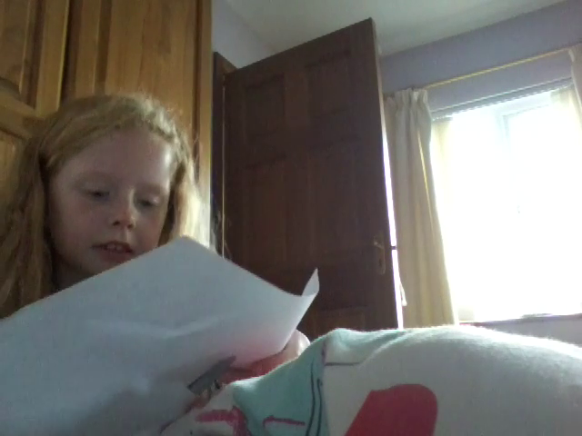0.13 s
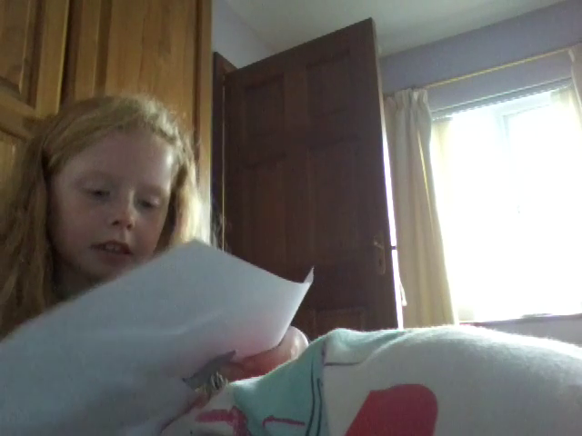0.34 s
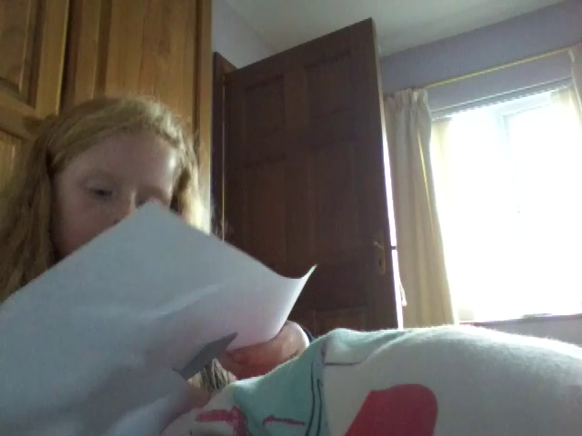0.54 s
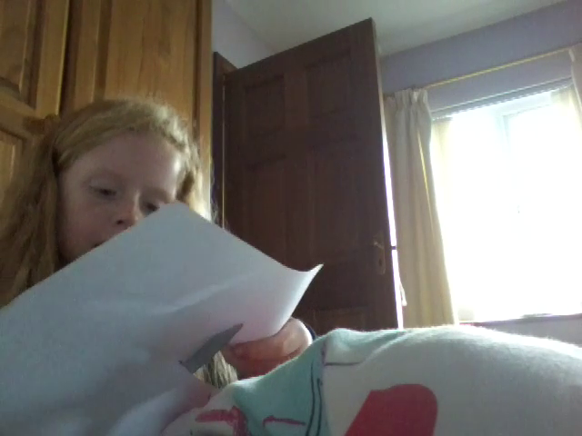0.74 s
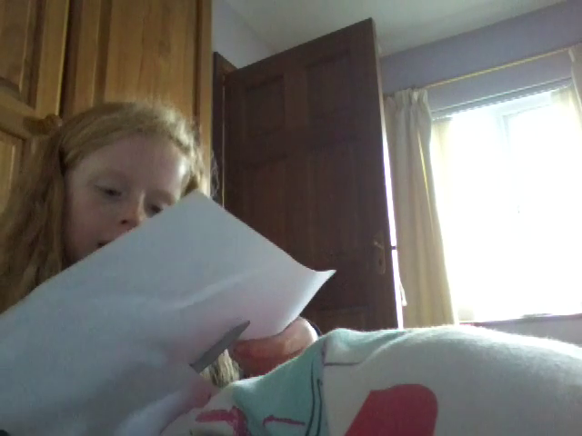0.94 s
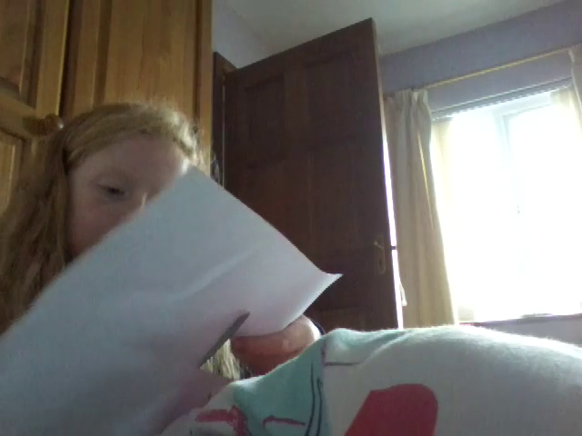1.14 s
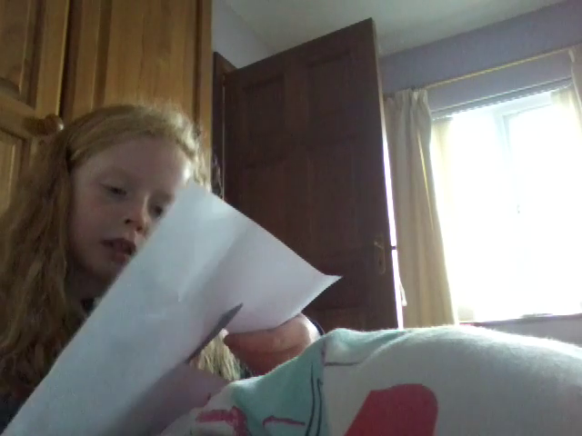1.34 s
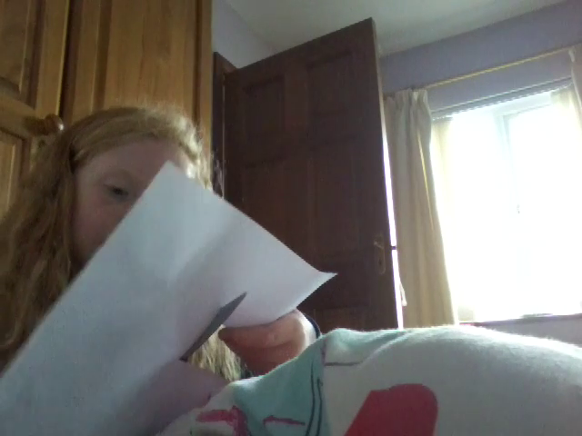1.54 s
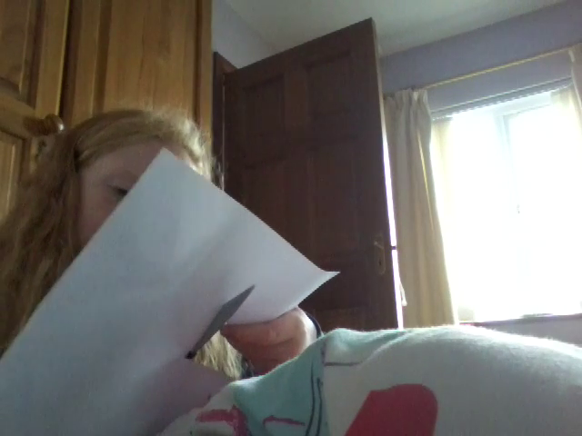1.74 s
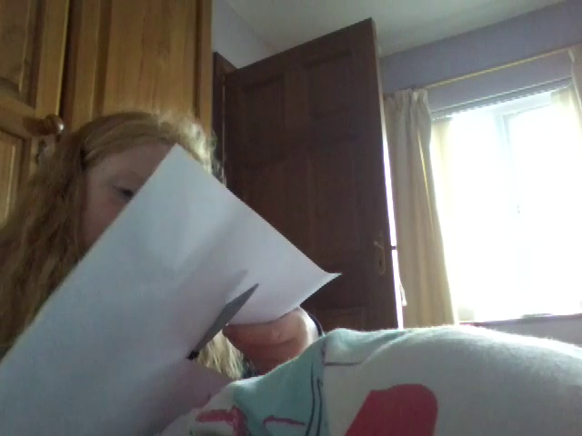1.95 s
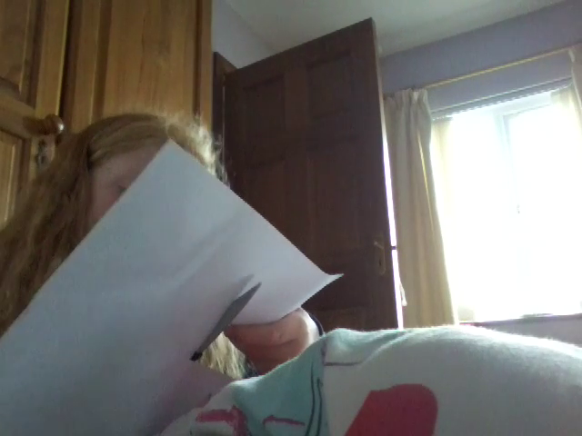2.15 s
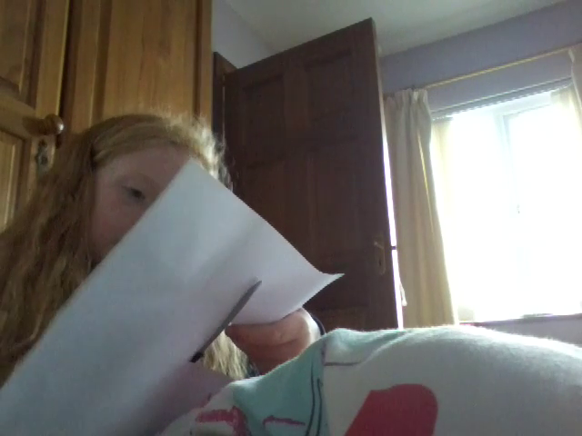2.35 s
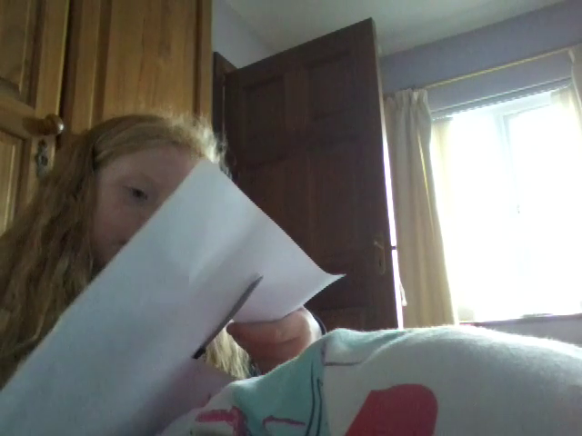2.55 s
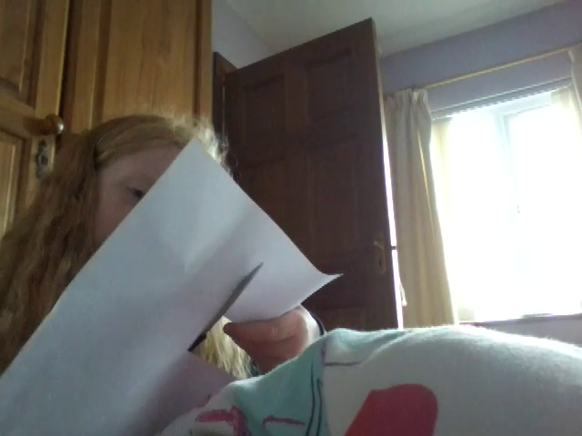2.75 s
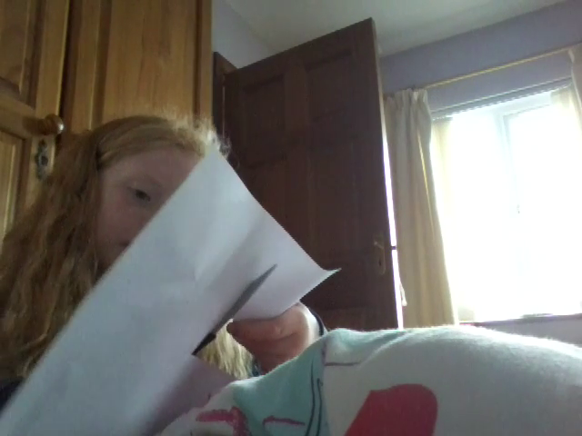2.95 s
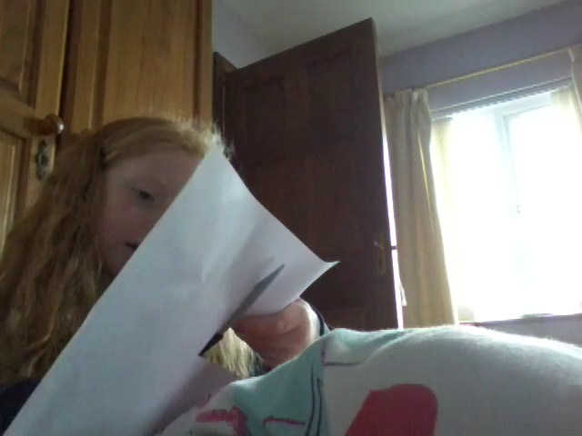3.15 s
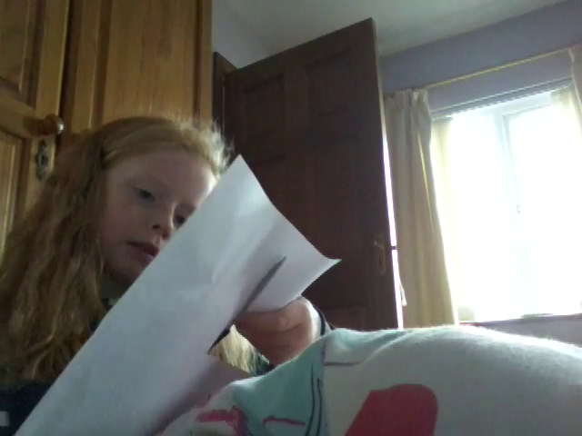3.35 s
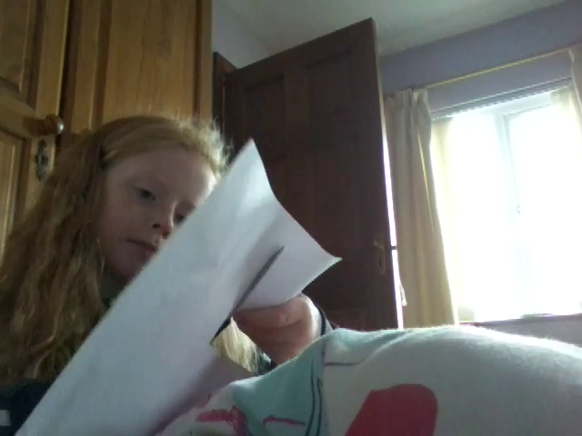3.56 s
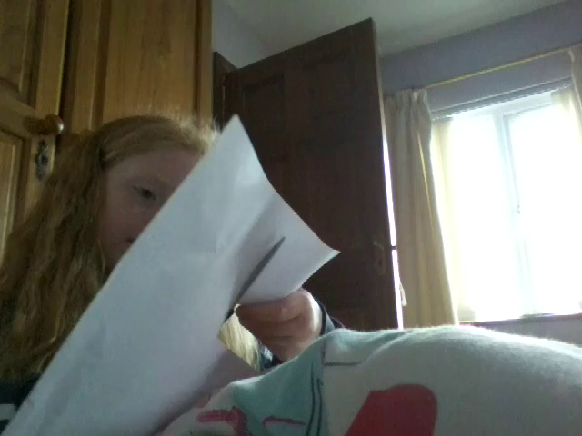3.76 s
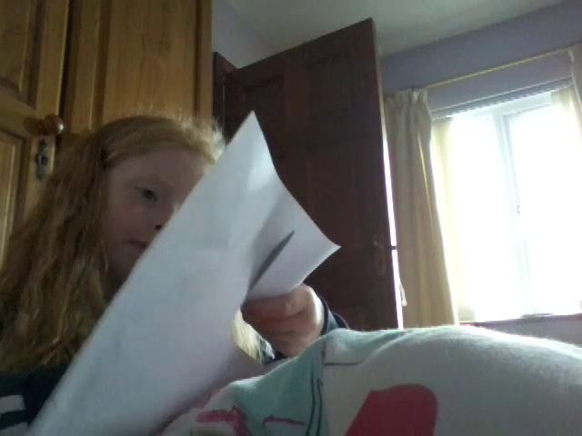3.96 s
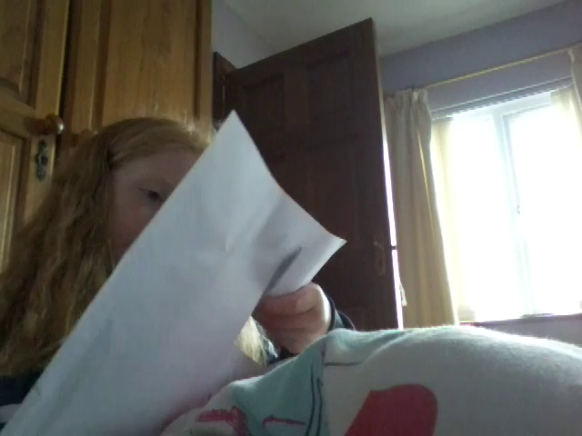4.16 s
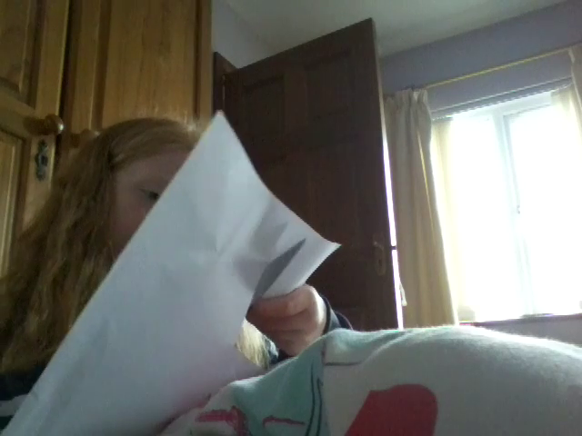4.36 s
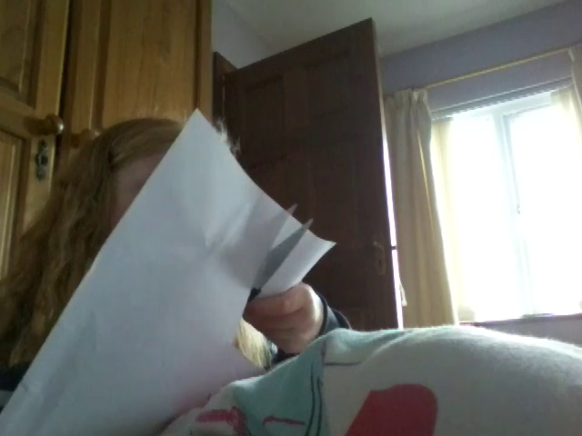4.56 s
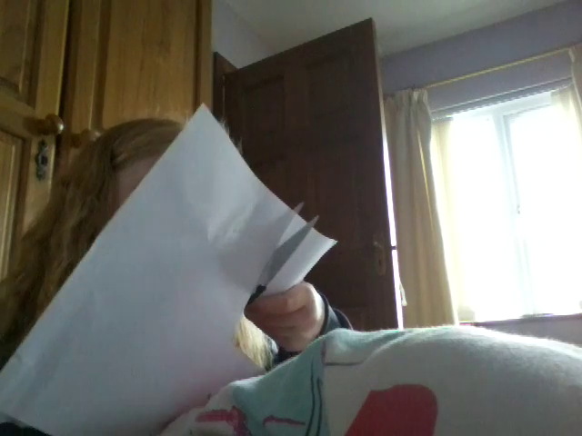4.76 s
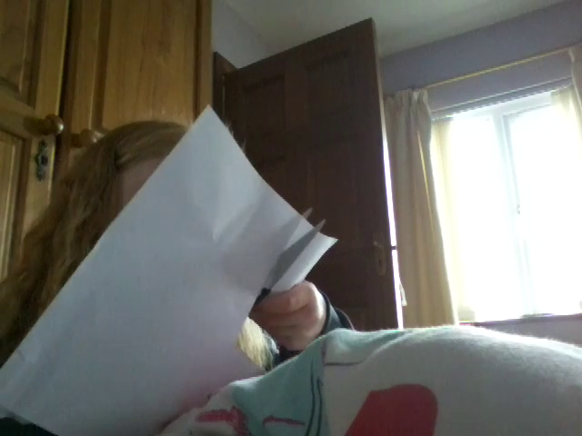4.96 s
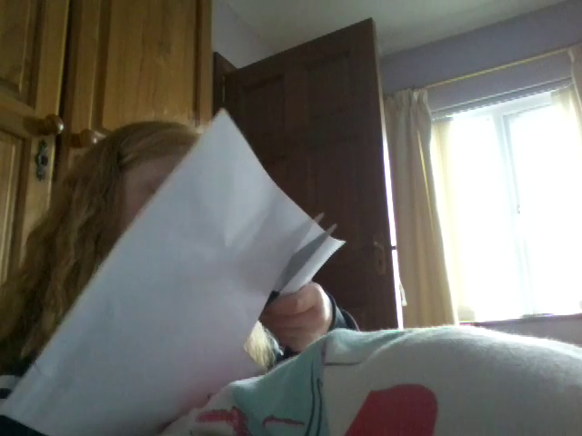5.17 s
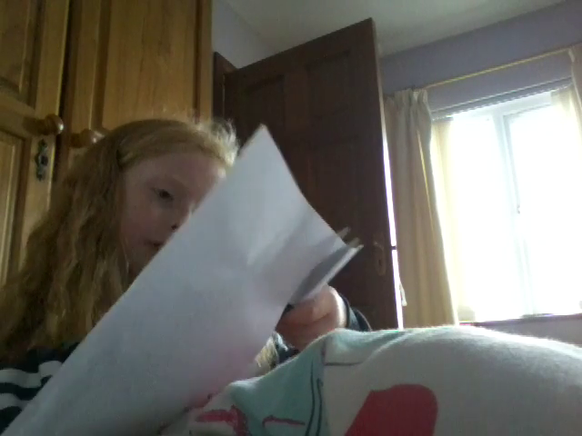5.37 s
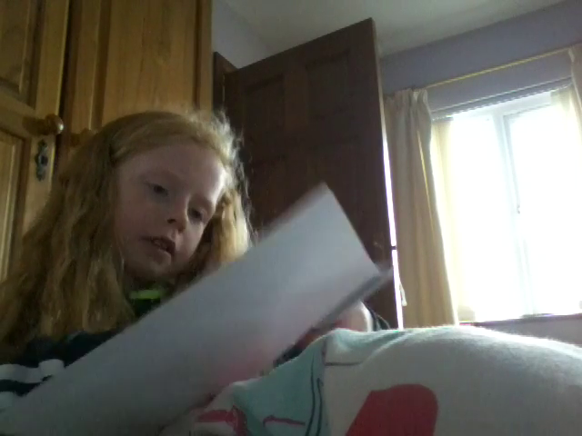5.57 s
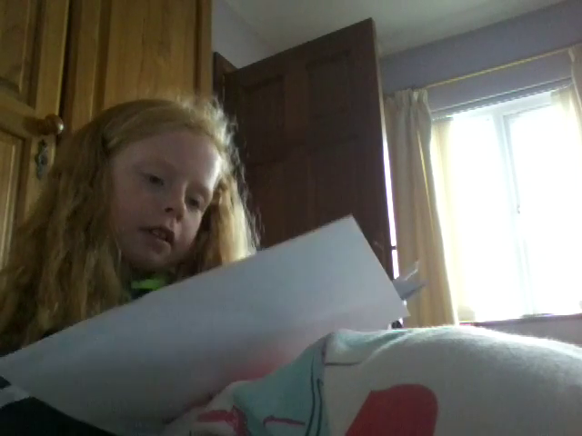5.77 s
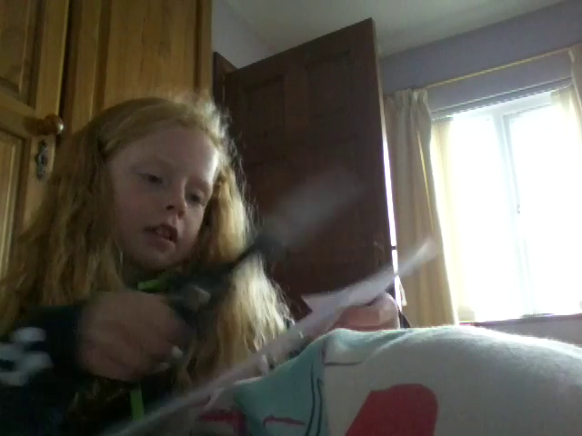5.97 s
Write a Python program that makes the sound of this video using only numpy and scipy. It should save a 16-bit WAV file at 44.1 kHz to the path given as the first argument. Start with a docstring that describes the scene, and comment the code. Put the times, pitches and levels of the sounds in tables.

```python
"""Scissors cut a large sheet of paper in a quiet bedroom, close to a small built-in microphone.
Randomly parting fibres make the tearing and crackle, in strokes with sharp bursts where the blades slip.
The same fibres set the sheet drumming and ringing; the moving sheet adds a low rumble, the room short echoes.
The recorder adds hiss and a pulsing whine near 15 kHz, and a suppressor turns quiet moments down."""
import sys
import numpy as np
from scipy import signal
from scipy.fft import rfft, irfft
from scipy.io import wavfile
from scipy.ndimage import uniform_filter1d, map_coordinates

SR = 44100
rng = np.random.default_rng(int(sys.argv[2]) if len(sys.argv) > 2 else 0)


def put_to_file(sound):
    """Save the sound as 16-bit audio at rate SR, in the file named by the first command-line argument."""
    columns = np.atleast_2d(sound).T  # one column per channel
    safe = np.clip(columns, -1, 1)
    whole_steps = np.round(safe * 32767)
    wavfile.write(sys.argv[1], SR, whole_steps.astype(np.int16))


N = 264952

# Strokes of the blades. Each row: start in seconds, swell in seconds, hold in seconds, tearing level in dB,
# change over the hold in dB, sheet crackle in dB relative to tearing, drumming in dB relative to tearing.
STROKES = [(0.0, 0.00067, 0.11, -43, -3.5, -11.5, -14), (0.098, .02, 0.078, -49.5, -3.5, -14, -19.5),
           (0.214, 0.033, 0.26, -54.5, -14, -16, -12), (0.38, 0.019, .05, -45, -6.5, -14.5, -16),
           (0.434, 0.048, 0.097, -45.5, 0.5, -15, -18.5), (0.587, 0.022, 0.067, -51, -5, -10.5, -23),
           (0.671, 0.054, 0.019, -49.5, 1, -22, -28), (0.824, 0.022, 0.058, -53, -2.5, -15, -12.5),
           (0.925, 0.026, 0.082, -38, -6, -14.5, -18), (1.073, 0.021, 0.038, -43, -2, -9.5, -22),
           (1.315, 0.014, 0.038, -41.5, 2, -14.5, -19.5), (1.356, 0.041, 0.027, -35, -10, -19.5, -25.5),
           (1.463, 0.028, 0.054, -36, 3, -20, -31.5), (1.655, 0.02, 0.048, -37.5, -4.5, -15.5, -29.5),
           (1.765, 0.024, 0.46, -66.5, 6, -17, -17), (1.842, 0.022, 0.0081, -50, -2, -8, -20),
           (2.024, 0.084, .01, -53.5, 1, -20, -20), (2.173, .03, 0.053, -56, 4.5, -21, -23),
           (2.274, 0.057, 0.057, -42, -6.5, -20, -23.5), (2.422, 0.028, 0.0081, -39, -4.5, -19, -32),
           (2.696, 0.026, 0.15, -43.5, -10.5, -17, -26), (2.804, 0.12, 0.041, -41.5, -4.5, -15.5, -25),
           (2.989, 0.041, 0.079, -55.5, -6, -13, -16), (3.142, 0.089, 0.14, -49, 6.5, -20, -22.5),
           (3.399, 0.015, 0.016, -35, -3, -20.5, -27), (3.468, 0.029, 0.23, -52, -1, -20, -22),
           (3.734, 0.056, .12, -46.5, 4, -16.5, -23.5), (3.892, 0.015, 0.15, -48, -7, -24, -21.5),
           (4.026, 0.06, 0.054, -35, -9, -14, -26), (4.11, 0.074, 0.063, -38, -5.5, -15, -27),
           (4.292, 0.11, 0.095, -46, 1.5, -15.5, -23), (4.486, 0.026, 0.094, -48.5, -5.5, -13.5, -18),
           (4.581, 0.025, 0.058, -50.5, 5, -13.5, -20), (4.7, 0.025, 0.22, -58, -5.5, -16, -14),
           (5.063, .06, 0.17, -56, -8, -27, -17), (5.255, 0.02, 0.2, -51.5, -4, -15.5, -20.5),
           (5.468, 0.025, 0.23, -40.5, -6, -17.5, -25), (5.713, 0.02, 0.19, -37, -21.5, -15.5, -23),
           (5.91, .06, 0.046, -55, 4, -8.5, -10.5)]
# Clear slips of the blades and snaps of the sheet. Each row: time in seconds (late in the swell), peak in dB,
# crackle rms in dB relative to the peak, drumming rms in dB relative to the peak, swell time in seconds.
SLIPS = [(0.068, -31.5, -16, -16, 0.0027), (0.1034, -28.5, -35, -34, 0.0035),
         (0.171, -30.5, -23, -27, 0.0034), (0.3915, -24, -28, -25, 0.0013), (0.4004, -37, -25, -23, 0.0018),
         (0.5048, -27, -40, -41, 0.0024), (0.514, -29, -35, -33, 0.0012), (0.7437, -34, -37, -43, 0.004),
         (0.8335, -39, -20, -32, 0.003), (0.932, -29.5, -19, -16.5, 0.003), (1.083, -20, -24, -31, 0.0024),
         (1.1164, -29.5, -13.5, -35, 0.0023), (1.3333, -26, -32, -46, 0.0039),
         (1.3743, -10.5, -29, -44, 0.001), (1.383, -20.5, -35, -42, 0.0016),
         (1.4716, -28.5, -27, -34, 0.0027), (1.481, -28, -39, -44, 0.0023),
         (1.558, -23.5, -22.5, -49, 0.005), (1.6633, -26, -19, -40, 0.0024),
         (1.717, -26.5, -23.5, -36, 0.0054), (1.8038, -37, -23, -31, 0.0026),
         (2.0233, -45, -18, -22, 0.0033), (2.0516, -36.5, -23, -35, 0.0044),
         (2.0847, -36, -19, -22, 0.0032), (2.157, -39, -15.5, -21, 0.0037),
         (2.1852, -30.5, -22.5, -25, 0.0069), (2.2314, -28.5, -27, -27, 0.0051),
         (2.2694, -31, -24, -27, 0.0049), (2.3082, -25.5, -31, -28, 0.0041),
         (2.337, -28.5, -28, -35, 0.003), (2.3583, -26.5, -32, -35, 0.0019),
         (2.373, -19.5, -39, -42, 0.0027), (2.431, -14, -33, -42.5, 0.0028),
         (2.6944, -36.5, -27, -28, 0.0024), (2.7096, -35, -32, -31, 0.0026), (2.9083, -33, -26, -34, 0.003),
         (3.1482, -41.5, -20, -31, 0.0035), (3.1827, -38.5, -21, -31, 0.0026),
         (3.2266, -35.5, -22, -22, 0.0032), (3.2765, -38, -14.5, -22, 0.003),
         (3.327, -26, -25.5, -34, 0.0035), (3.4086, -22, -37, -22, 0.0032), (3.4942, -27, -31, -24, 0.0028),
         (3.5865, -32.5, -35, -31, 0.0022), (3.6156, -18, -28.5, -43, 0.001),
         (3.6258, -23, -40, -50, 0.0012), (3.756, -36, -20, -21, 0.0027), (3.7742, -27, -18.5, -30, 0.0027),
         (3.8056, -29, -21, -33, 0.0046), (3.84, -23.5, -30, -40, 0.0019), (3.8888, -21, -30, -51, 0.0022),
         (3.973, -31, -25, -31, 0.0024), (4.0238, -31, -17.5, -23, 0.003), (4.053, -29, -29, -29, 0.002),
         (4.0715, -15, -16, -28, 0.0021), (4.0934, -29.5, -15, -21, 0.0046),
         (4.1674, -26.5, -21, -23.5, 0.0055), (4.1983, -26, -16.5, -23.5, 0.0073),
         (4.3435, -28, -27, -34, 0.0017), (4.404, -28, -23.5, -39, 0.0034),
         (4.6075, -39, -11.5, -26, 0.0039), (5.0579, -38.5, -19, -27, 0.0024),
         (5.0834, -47, -15, -12, 0.003), (5.1153, -28.5, -25, -30, 0.0022), (5.1685, -35, -17, -24, 0.0027),
         (5.2804, -25, -23.5, -32, 0.004), (5.3028, -29, -29, -35, 0.0028),
         (5.333, -28.5, -25, -24, 0.0059), (5.37, -31.5, -22, -23, 0.0033), (5.3844, -28, -30, -22, 0.0063),
         (5.423, -21, -26.5, -25, 0.004), (5.485, -17, -24.5, -32, 0.0054), (5.5199, -22, -26, -37, 0.0027),
         (5.5458, -22, -30, -34, 0.0058), (5.5675, -21.5, -33, -47, 0.002),
         (5.6007, -16, -29.5, -42, 0.0069), (5.6573, -17, -28, -30.5, 0.0016),
         (5.6806, -14, -40, -32, 0.002), (5.7306, -14, -29.5, -34, 0.0044),
         (5.7433, -20, -20.5, -32, 0.0038), (5.7537, -23, -33, -31, 0.0043)]
# Colour of the tearing fibres. Each row: frequency in Hz, relative level in dB per Hz.
TEARING_COLOUR = [(1650, -40), (2800, -14.5), (3760, -8), (4130, -9), (5790, 3.5), (6890, -2),
                  (8710, -12.5), (9200, -13.5), (12000, -39), (20200, -120)]
# Colour of the finest fibres. Each row: frequency in Hz, relative level in dB per Hz.
SIZZLE_COLOUR = [(5180, -41), (8800, 0.5), (9010, -14.5), (11200, -13.5), (13800, -20), (15600, -24)]
# Colour of the sheet's crackle. Each row: frequency in Hz, relative level in dB per Hz.
CRACKLE_COLOUR = [(530, -29.5), (900, -8.5), (1250, -2.5), (1390, 1.5), (1900, -1.5), (2260, 2), (2900, 7),
                  (3770, -56.5), (6380, -120)]
# Colour of the sheet's drumming. Each row: frequency in Hz, relative level in dB per Hz.
DRUMMING_COLOUR = [(150, -42.5), (250, -2.5), (378, -6), (550, -5), (822, -11), (950, -20.5), (1240, -14.5),
                   (2090, -120)]
# Share of the finest fibres. Each row: time in seconds, level in dB relative to tearing.
FINENESS = [(0, -16), (1, -18.5), (2.3, -18), (3.8, -20), (4.8, -15.5), (5.3, -15), (5.6, -14), (5.72, -11),
            (6.01, -22)]
# Pitch of the free part of the sheet, tighter or slacker. Each row: time in seconds, frequency in Hz.
SHEET_PITCH = [(0.0, 670), (0.32, 523), (0.92, 703), (1.29, 550), (2.09, 590), (2.68, 490), (3.85, 575),
               (4.42, 603), (4.75, 510), (5.47, 630), (6.01, 513)]
# Air and bedding moved by the sheet. Each row: time in seconds, level in dB relative to drumming.
RUMBLE_LEVEL = [(0, -3.5), (.8, -1.5), (1.4, -5.5), (2.2, -2), (2.9, 2.5), (3.8, 3), (4.6, 1), (5.3, 1),
                (5.62, 5.5), (5.74, 9.5), (5.86, 8), (6.01, -2)]
# Colour of that rumble. Each row: frequency in Hz, relative level in dB per Hz.
RUMBLE_COLOUR = [(18, -57), (30, -3), (70, 2), (129, -4), (193, 1), (227, -5.5), (300, -3), (390, -25),
                 (660, -120)]
# How long the room takes to fade by 60 dB. Each row: frequency in Hz, time in seconds.
ROOM_T60 = [(200, 0.85), (800, 0.18), (2100, 0.16), (5500, 0.15), (12000, 0.12)]
# Colour of the recorder's hiss. Each row: frequency in Hz, relative level in dB per Hz.
HISS_COLOUR = [(20, -16), (40, -8), (60, -3), (330, -11.5), (700, -13.5), (1600, -15.5), (3500, -17.5),
               (5900, -13.5), (8700, -18), (15500, -19.5)]

# All levels are those before the suppressor.
SWELL_POWER, STROKE_FADE_DB_PER_S = 0.82, 374  # shape of the swell; how fast a stroke dies after its hold
FIBRES_PER_S, FIBRE_SPREAD_DB = 9000, 2.5
GRAIN_CREST_DB = 9.0  # how far the loudest fibres of a slip stand above its rms
CHATTER_DB = 1.5  # trembling of the blades
SMALL_SLIPS_PER_S, SMALL_SLIP_DB, SMALL_SLIP_S = 26, 2.5, 0.0019  # lift for an average slip; swell time
DIRECT_DRUM_DB, SHEET_RING_DB, SHEET_WIDTH_HZ = -7.5, 1, 173
SHEET_ECHO_DB, SHEET_ECHO_S = -8, 0.0015  # the delay wanders around this value
RUMBLE_LAG_S = 0.028
ROOM_DB, ROOM_GAP_S = -11.5, 0.0052  # the reflections grow in over the gap
WHINE_HZ, WHINE_DB = 14998.7, -65
PULSES_PER_S, WHINE_START_S, WHINE_DUTY = 14.93, 0.029, 0.69  # one pulse begins at the start time
HISS_DB = -59
MIC_LOW_HZ, CUTOFF_HZ = 43.4, 15540
OFFSET = -0.00041  # constant bias of the converter, before the suppressor
FULL_CUT_DB, BASS_SHARE = -30, 0.76  # gain in the deepest quiet; share of those dB given to the bass
KNEE_DB, KNEE_WIDTH_DB, LEVEL_SMOOTHING_S = -56.5, 8, 0.019


def paper(pushed):
    """The same parting fibres sound directly and set the sheet going."""
    tearing, crackle, drumming = np.hypot(pushed * chatter(), slips())
    grains = fibres()
    sizzle = tearing * amp(in_time(FINENESS))
    bright = (colour(tearing * grains, TEARING_COLOUR)
              + colour(sizzle * grains, SIZZLE_COLOUR)
              + colour(crackle * grains, CRACKLE_COLOUR))
    drum = colour(drumming * grains, DRUMMING_COLOUR)
    direct = bright + amp(DIRECT_DRUM_DB) * drum + amp(SHEET_RING_DB) * sheet_ring(drum)
    return direct + sheet_echo(direct)


def strokes():
    """Strength of tearing, crackle and drumming: each stroke swells, holds and fades; overlaps add as power."""
    t = np.arange(SR // 2) / SR
    power = np.zeros((3, N + SR))
    for start, swell, hold, tearing_db, change_db, *parts_db in STROKES:
        hold_db = change_db * np.clip((t - swell) / hold, 0, 1)
        fade_db = STROKE_FADE_DB_PER_S * np.maximum(t - swell - hold, 0)
        shape = np.minimum(t / swell, 1) ** SWELL_POWER * amp(hold_db - fade_db)
        levels = amp(tearing_db + np.array([0, *parts_db]))
        i = max(round(start * SR), 0)
        power[:, i:i + len(t)] += np.outer(levels, shape) ** 2
    return np.sqrt(power[:, :N])


def slips():
    """Strength of tearing, crackle and drumming when stuck blades let go or the sheet snaps."""
    force = np.zeros((3, N + SR))
    for time, peak_db, *parts_db, swell in SLIPS:
        levels = amp(peak_db + np.array([-GRAIN_CREST_DB, *parts_db]))
        i = round((time - 0.72 * swell) * SR)
        force[:, i:i + SR // 10] += np.outer(levels, burst(swell))
    return force[:, :N]


def burst(swell):
    """A slip swells within milliseconds and fades a little more slowly."""
    age = np.arange(SR // 10) / SR / max(swell, 0.0008)
    return (age * np.exp(1 - age)) ** 1.55


def chatter():
    """The blades tremble and catch in small random slips, which lift the stroke they fall in."""
    sizes = np.minimum(rng.exponential(1, N), 1.8)
    caught = (rng.random(N) < SMALL_SLIPS_PER_S / SR) * sizes
    small_slips = signal.fftconvolve(caught, burst(SMALL_SLIP_S))[:N]
    tremble = drift(65) + 0.4 * drift(340)
    return amp(CHATTER_DB * tremble + SMALL_SLIP_DB * small_slips)


def fibres():
    """Fibres part at random as single clicks, a few much louder than the rest; rms 1."""
    sizes = amp(FIBRE_SPREAD_DB * np.minimum(rng.exponential(1, N), 4.0))
    signs = rng.choice([-1, 1], N)
    parted = rng.random(N) < FIBRES_PER_S / SR
    return rms_one(sizes * signs * parted)


def sheet_ring(drum):
    """A resonance whose pitch follows the bending of the sheet, stepped in short blocks."""
    out, state = np.zeros(N), np.zeros(2)
    r = np.exp(-np.pi * SHEET_WIDTH_HZ / SR)
    times, pitches = np.transpose(SHEET_PITCH)
    b = [(1 - r * r) / 2, 0, (r * r - 1) / 2]
    for i in range(0, N, 256):
        hz = np.interp(i / SR, times, pitches)
        a = [1, -2 * r * np.cos(2 * np.pi * hz / SR), r * r]
        out[i:i + 256], state = signal.lfilter(b, a, drum[i:i + 256], zi=state)
    return out


def sheet_echo(direct):
    """The swaying sheet reflects the cut after a wandering delay, so the colour shifts from snip to snip."""
    lag = SHEET_ECHO_S * SR * amp(3.21 * drift(1.482))
    return amp(SHEET_ECHO_DB) * map_coordinates(direct, [np.arange(N) - lag], order=3)


def rumble(drumming):
    """Lumpy low noise that lags behind the drumming of the strokes."""
    r = np.exp(-1 / (RUMBLE_LAG_S * SR))
    swing = signal.lfilter([1 - r], [1, -r], drumming, zi=[drumming.mean()])[0]
    lumps = amp(in_time(RUMBLE_LEVEL) + 2.0 * drift(7.1))
    return swing * lumps * colour(rng.standard_normal(N), RUMBLE_COLOUR)


def bedroom(x):
    """Dense reflections after a short gap, each octave dying at its own rate."""
    t, tail = np.arange(SR // 2) / SR, 0
    for hz in 125 * 2. ** np.arange(7):
        octave = signal.butter(2, [hz, 2 * hz], "band", fs=SR, output="sos")
        band = signal.sosfilt(octave, rng.standard_normal(len(t)))
        tail = tail + band * amp(-60 * t / at_hz(ROOM_T60, hz * np.sqrt(2)))
    tail = tail * np.clip(t / ROOM_GAP_S, 0, 1)
    return amp(ROOM_DB) * signal.fftconvolve(x, tail / np.sqrt(np.sum(tail ** 2)))[:N]


def scene():
    """The cut paper, its echo in the room and the rumble."""
    pushed = strokes()
    cut = paper(pushed)
    return (cut + bedroom(cut) + rumble(pushed[2]))[None]


def whine():
    """A thin electronic tone that switches on and off regularly and wavers."""
    t = np.arange(N) / SR
    on = ((t - WHINE_START_S) * PULSES_PER_S) % 1 < WHINE_DUTY
    pulses = uniform_filter1d(on * 1., size=400)  # softens the switching
    tone = np.sin(2 * np.pi * WHINE_HZ * t + 0.7 * drift(5))
    return amp(WHINE_DB + 2.0 * drift(5.5)) * pulses * tone


def hiss():
    """Steady coloured noise of the recorder."""
    return amp(HISS_DB) * colour(rng.standard_normal(N), HISS_COLOUR)


def suppress(x):
    """The gain follows the smoothed level: quiet moments are turned down, the bass less."""
    r = np.exp(-1 / (LEVEL_SMOOTHING_S * SR))
    power = signal.lfilter([1 - r], [1, -r], x ** 2, zi=[[1e-5]])[0]
    level_db = 10 * np.log10(power + 1e-12)
    gain_db = FULL_CUT_DB / (1 + 2 * np.exp((level_db - KNEE_DB) / KNEE_WIDTH_DB))
    bass = signal.lfilter(*signal.butter(1, 250, fs=SR), x)
    return (x - bass) * amp(gain_db) + (bass + OFFSET) * amp(BASS_SHARE * gain_db)


def record(dry):
    """Hiss and whine join, the small capsule drops the deepest bass, the suppressor acts, the top is cut."""
    x = dry + hiss() + whine()
    x = signal.sosfilt(signal.butter(2, MIC_LOW_HZ, "high", fs=SR, output="sos"), x)
    x = suppress(x)
    return signal.sosfilt(signal.ellip(14, 0.5, 70, CUTOFF_HZ, fs=SR, output="sos"), x)


def amp(db):
    """Decibels to gain."""
    return 10 ** (np.asarray(db) / 20)


def rms_one(x):
    """Scaled to rms 1."""
    return x / np.sqrt(np.mean(x ** 2) + 1e-20)


def at_hz(points, hz):
    """A (Hz, value) table read on a log-frequency axis."""
    p = np.array(points)
    return np.interp(np.log(np.maximum(hz, 1)), np.log(np.maximum(p[:, 0], 1e-9)), p[:, 1])


def in_time(points):
    """A (seconds, value) table read at every sample."""
    times, values = np.transpose(points)
    return np.interp(np.arange(N) / SR, times, values)


def colour(x, spectrum):
    """Filter with the given shape that never sounds ahead of its input; white noise keeps its rms."""
    size = 8192
    shape = amp(at_hz(spectrum, np.arange(size // 2 + 1) * SR / size))
    ceps = irfft(np.log(shape))
    # folding the cepstrum forward makes the filter minimum-phase
    ceps[1:size // 2] *= 2
    ceps[size // 2 + 1:] = 0
    h = irfft(np.exp(rfft(ceps)))
    return signal.fftconvolve(x, h / np.sqrt(np.sum(h ** 2)))[:N]


def drift(rate):
    """Random wandering of rms 1; a higher rate in Hz wanders faster."""
    r = np.exp(-2 * np.pi * rate / SR)
    noise = rng.standard_normal(N + SR)
    return rms_one(signal.lfilter([1], [1, -2 * r, r * r], noise)[SR:])  # skips the first second to settle


dry = scene()
out = record(dry)
put_to_file(out)
```